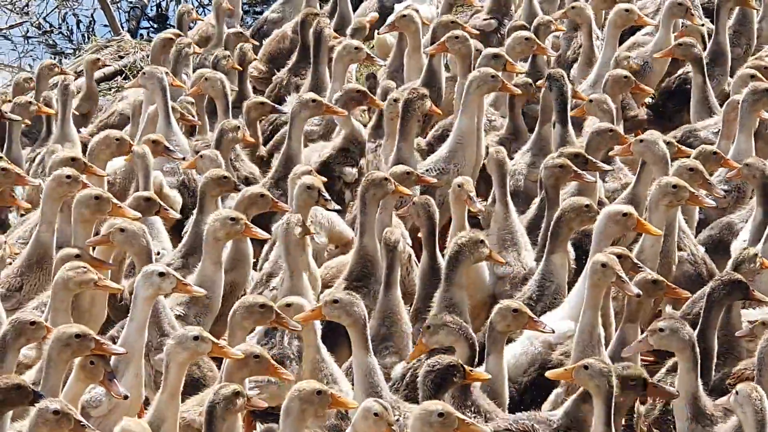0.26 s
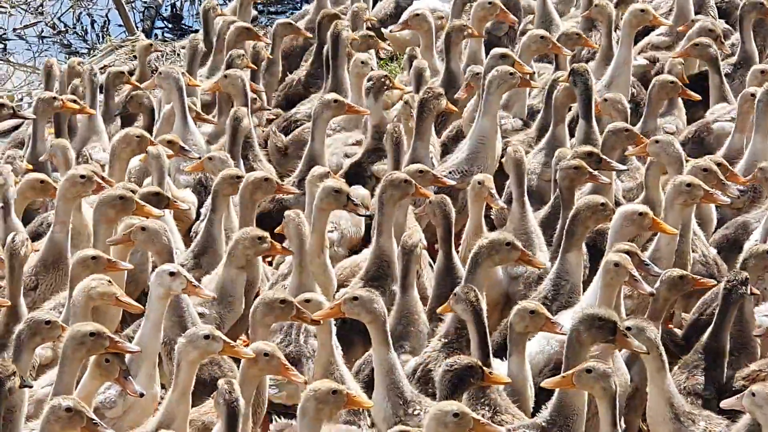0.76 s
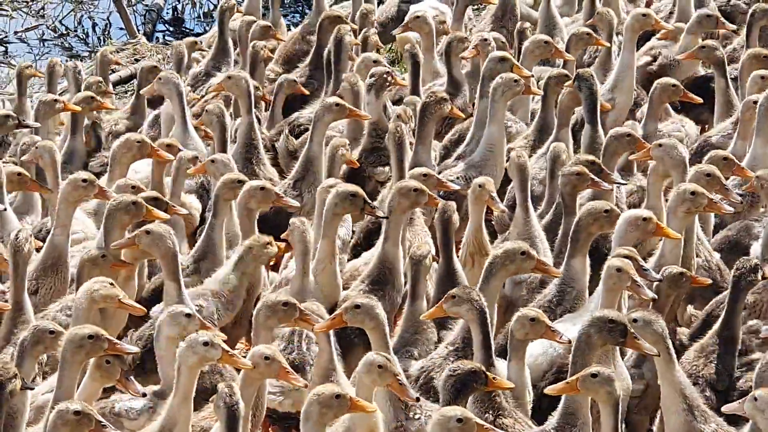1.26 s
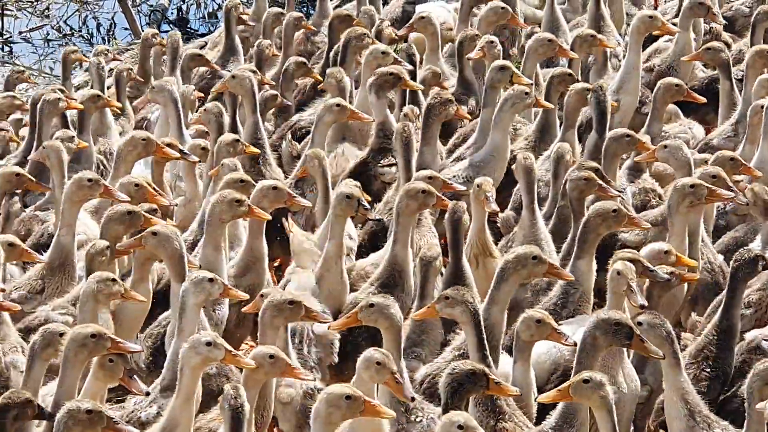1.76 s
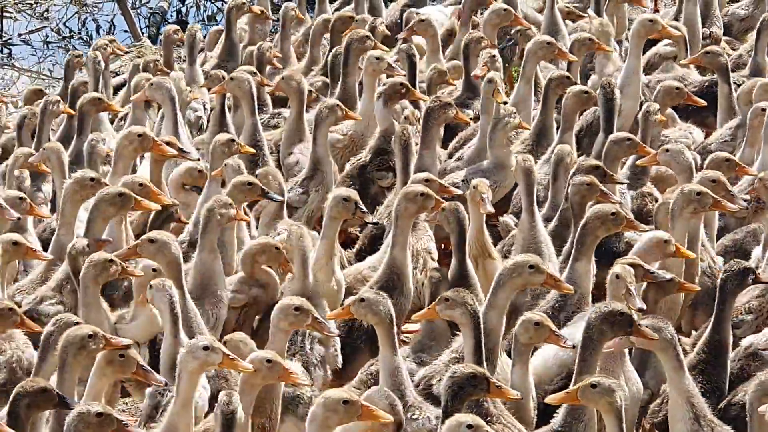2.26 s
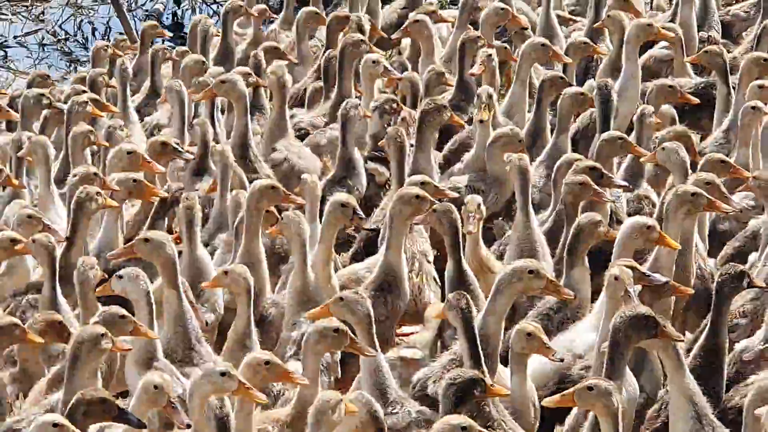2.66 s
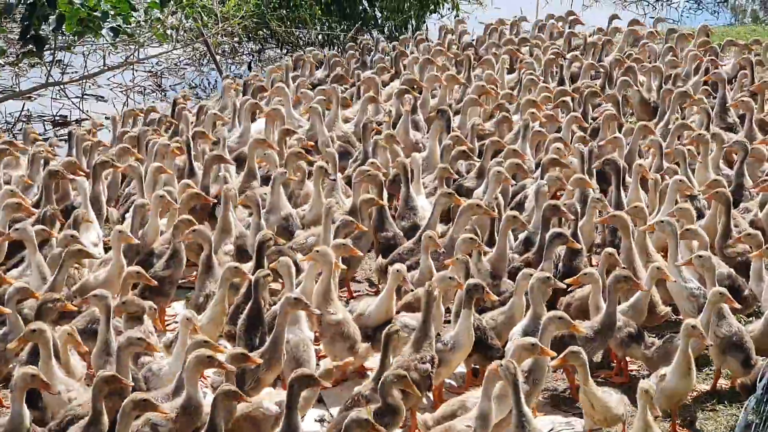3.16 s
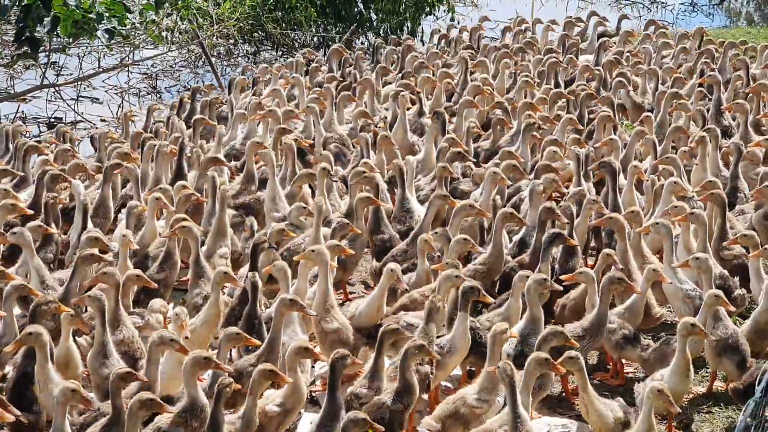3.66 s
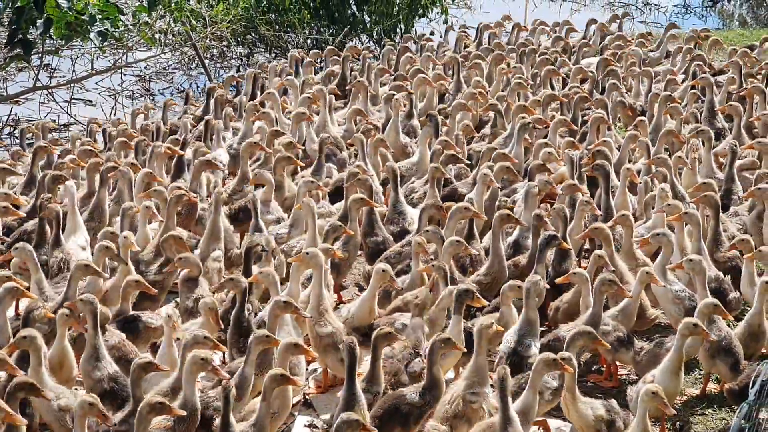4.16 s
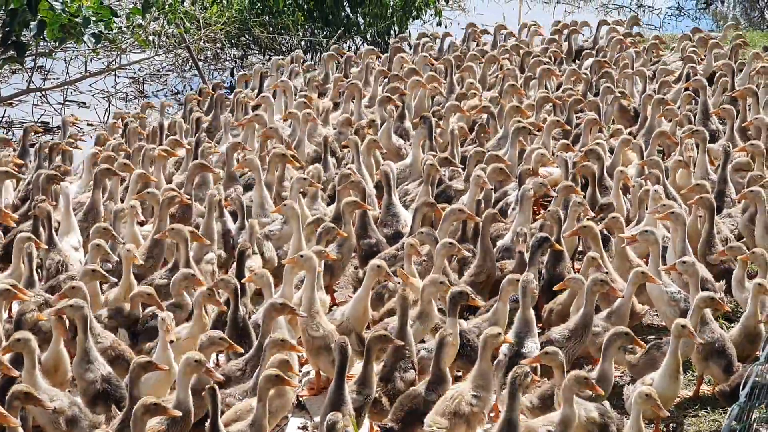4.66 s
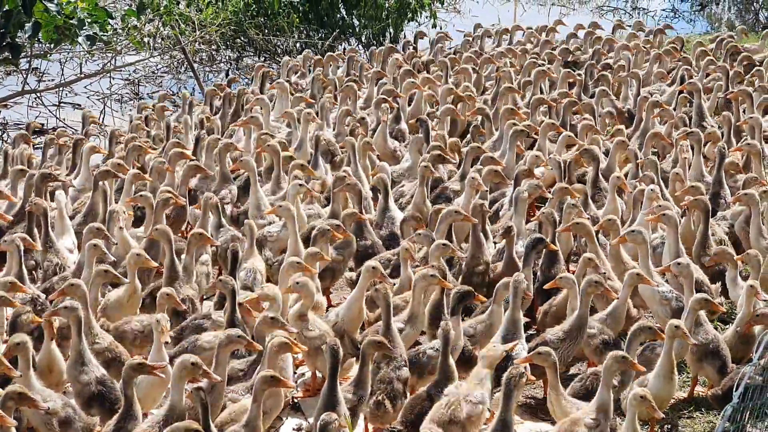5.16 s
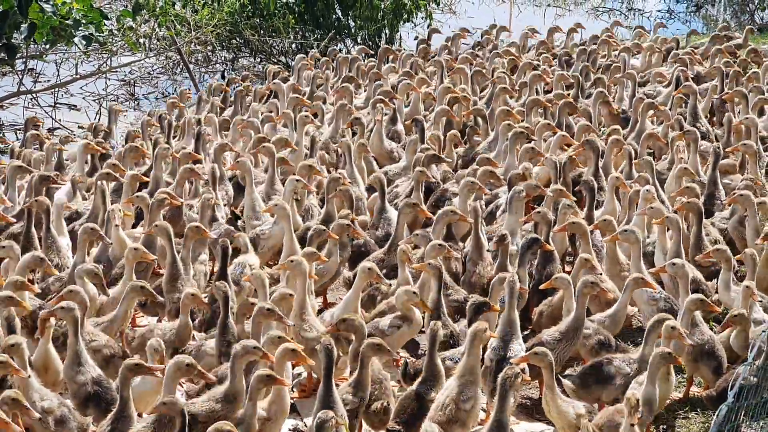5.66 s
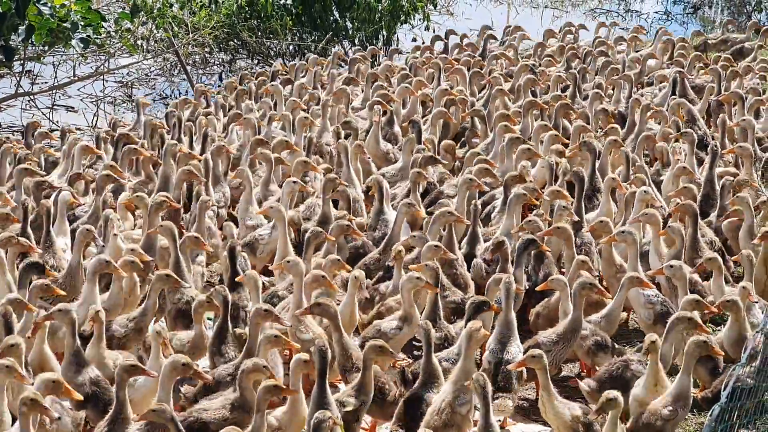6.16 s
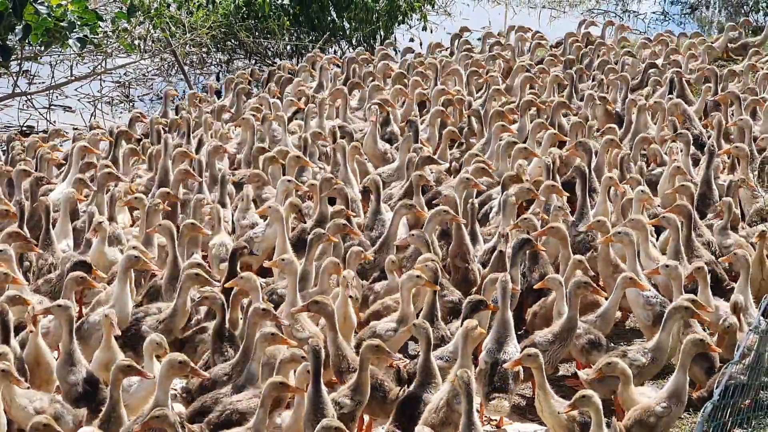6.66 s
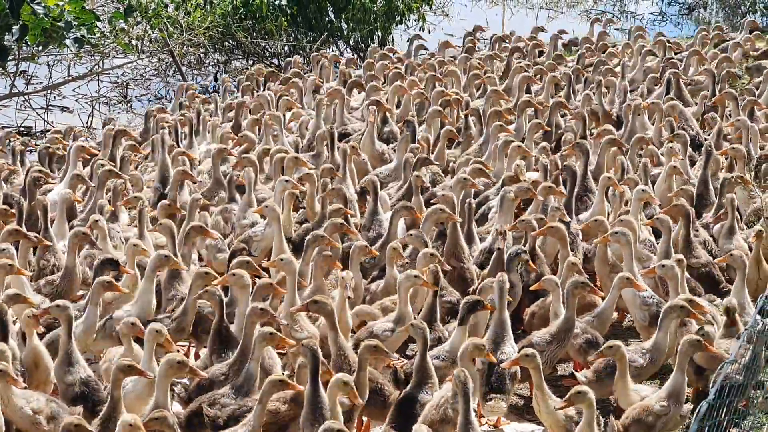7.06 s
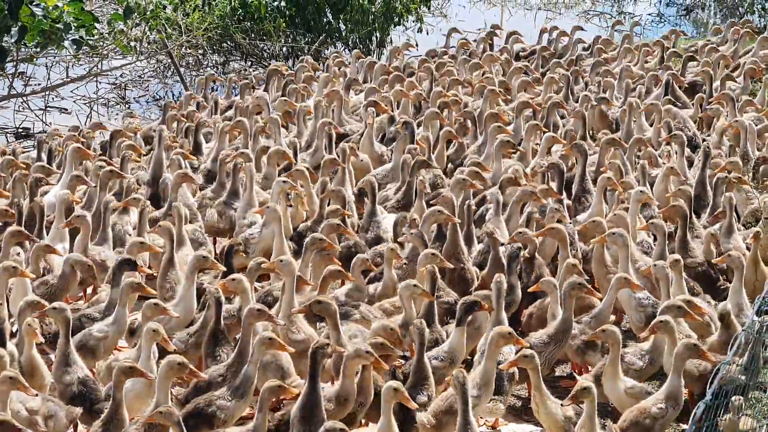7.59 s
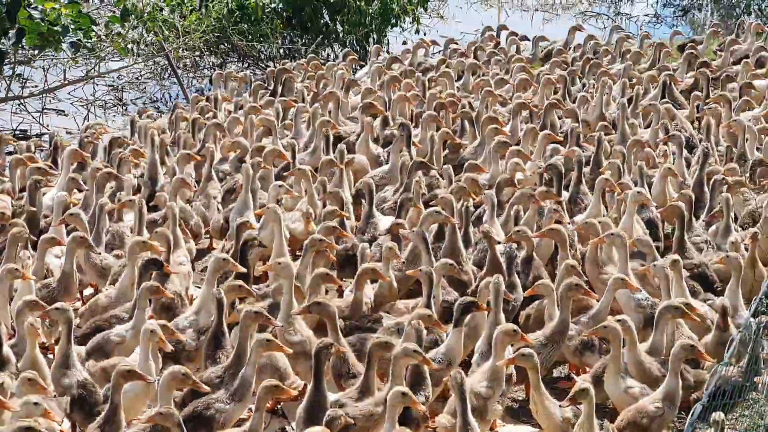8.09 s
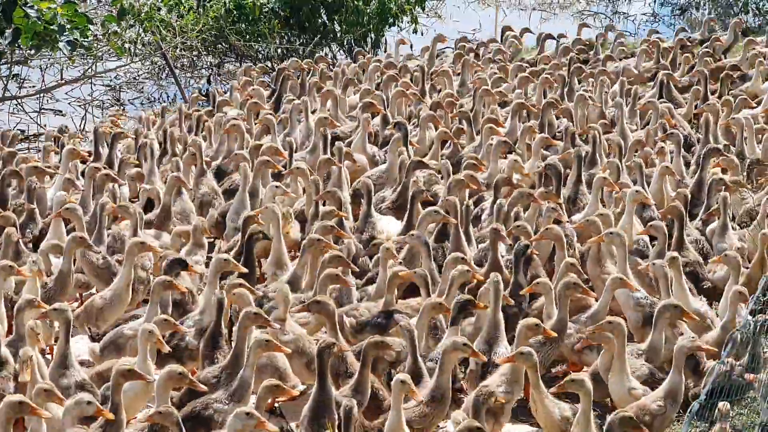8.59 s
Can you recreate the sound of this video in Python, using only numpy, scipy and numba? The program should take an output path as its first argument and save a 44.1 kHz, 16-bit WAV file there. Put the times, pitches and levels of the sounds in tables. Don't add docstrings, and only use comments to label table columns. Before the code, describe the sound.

Packed young ducks on an open bank whistle all at once, piercing and nearly pure in tone, blurring into a wash of far birds. Older ducks add low chirps, rough quacks and soft grunts. The nearest peeps are strong early on; then the sound cuts to a position farther back, where scattered peeps, squeaks and quacks ride the steady flock. Little echo, slight airy hiss, faint outdoor rumble, quieter left channel.

```python
import sys
import numpy as np
from scipy import signal
from scipy.fft import rfft, irfft, next_fast_len
from scipy.io import wavfile
from scipy.ndimage import uniform_filter1d, map_coordinates
from numba import njit

SR = 44100
rng = np.random.default_rng(int(sys.argv[2]) if len(sys.argv) > 2 else 0)


def store_wav(level_fs):
    pcm = np.round(np.clip(np.atleast_2d(level_fs), -1, 1) * 32767)
    wavfile.write(sys.argv[1], SR, pcm.T.astype(np.int16))


def invert_db(x):
    u = np.asarray(x, float) / 20
    return 10 ** u


N = 389403
CHANGE_S = 3.1705
TOP_HZ = 15750
SAG = .11
RASP, CROWD_RASP = .18, .3
ARCH_PER_S, STRAIGHT_S = 0.328, 0.037


def unit(x):
    return x / np.sqrt(np.mean(x ** 2) + 1e-20)


def along(points, hz, count=1):
    table = np.transpose(points)
    return np.interp(np.log(hz + 1), np.log(table[0] + 1), table[count])


def filtered(x, response):
    m = next_fast_len(N + 8192)
    return irfft(rfft(x, m) * response(np.fft.rfftfreq(m, 1 / SR)), m)[..., :N]


def wobble(rate):
    knots = rng.standard_normal(int(N * rate / SR) + 4)
    return map_coordinates(knots, [np.arange(N) * rate / SR])


def by_place(near_db, far_db):
    return invert_db(np.where(np.arange(N) / SR < CHANGE_S, near_db, far_db))


def rush(spectrum, alike, patchy_db):
    z = signal.stft(rng.standard_normal((2, N + 512)), nperseg=512)[2]
    field = uniform_filter1d(rng.standard_normal(z.shape[1:]), size=4, axis=0)
    field = uniform_filter1d(field, size=8, axis=1)
    a, b = signal.istft(z * invert_db(patchy_db * unit(field)), nperseg=512)[1][:, :N]
    alike = np.clip(alike, 0, 1)
    left = alike * a + np.sqrt(1 - alike ** 2) * b
    return unit(filtered(np.array([left, a]), lambda hz: invert_db(along(spectrum, hz))))


@njit
def sing(notes, partials, place, flutter, shake, rasp, edge, droop, hook, sr, n):
    out = np.zeros((2, n))
    for i in range(len(notes)):
        start, size = int(notes[i, 0] * sr), int(notes[i, 1] * sr)
        a, b, c = notes[i, 2], notes[i, 3], notes[i, 4]
        phase = 0.0
        for j in range(max(0, -start), min(size, n - start)):
            u = j / size
            hz = a * (2 * u - 1) * (u - 1) + 4 * b * u * (1 - u) + c * u * (2 * u - 1)
            hz *= 1 - droop * u ** 6 + hook * np.exp(-20 * u)
            phase += 2 * np.pi * hz / sr * (1 + shake * flutter[(j + i * 7919) % n])
            swell = notes[i, 5] * np.sin(np.pi / 2 * min(1.0, 2 * u / edge, (1 - u) / edge)) ** 2
            swell *= np.exp(rasp * flutter[(j + i * 5081 + n // 2) % n])
            for k in range(partials.shape[1]):
                strength = swell * partials[i, k]
                left_phase = (k + 1) * (phase + place[i, 1]) + k * k
                out[0, start + j] += strength * place[i, 0] * np.sin(left_phase)
                out[1, start + j] += strength * np.sin((k + 1) * phase + k * k)
    return out


def voices(notes, partial_db, scatter_db, spread, shake, edge, droop=SAG, rasp=RASP, hook=0.):
    notes = np.array(notes, float)
    notes[:, 5] = invert_db(notes[:, 5])
    count = np.shape(partial_db)[-1]
    luck = rng.standard_normal((len(notes), 2 + count))
    is_overtone = np.arange(count) > 0
    partials = invert_db(partial_db + scatter_db * luck[:, 2:] * is_overtone)
    place = np.column_stack([invert_db(4.24 * spread * luck[:, 0]), spread * luck[:, 1]])
    edge = np.clip(edge, .02, .5)
    return sing(notes, partials, place, wobble(150), shake, rasp, edge, droop, hook, SR, N)


def arched(calls, arch_share):
    s, length, hz, glide, db = np.transpose(calls)
    ends = hz * (1 - arch_share * ARCH_PER_S * (length - STRAIGHT_S))
    return np.column_stack([s, length, ends - glide / 2, hz, ends + glide / 2, db])


# start_s, length_s, middle_hz, glide_hz, level_db
LEAD_PEEPS = [
    (0.082, 0.11, 3230, 332, -20.5),
    (0.352, 0.12, 3254, 382, -18),
    (0.64, 0.12, 3190, 356, -18.5),
    (4.66, 0.07, 2095, -2, -26),
    (4.92, 0.08, 2274, 263, -22),
    (5.178, 0.088, 2272, 234, -20.5),
    (5.45, 0.081, 2250, 200, -25),
]
# start_s, length_s, middle_hz, glide_hz, level_db
NEAR_PEEPS = [(0.146, 0.039, 2890, -2, -21), (0.176, 0.0815, 3040, 62, -14.5),
              (0.472, 0.084, 3010, 260, -14), (0.745, 0.105, 3007, 209, -16),
              (0.999, 0.047, 3130, -280, -21.5), (1.075, 0.095, 2913, 2, -15.5),
              (2.93, 0.055, 2500, 207, -24), (1.54, 0.08, 2740, -130, -31.5),
              (1.573, 0.087, 2648, 185, -26), (1.858, 0.035, 2790, -190, -18.5),
              (1.879, 0.11, 2430, 121, -22.5), (2.046, 0.051, 2780, -250, -18.5),
              (2.103, 0.028, 2830, -100, -16), (2.178, 0.081, 2910, -110, -19),
              (2.223, 0.11, 2780, 40, -33), (3.015, 0.055, 2500, 78, -28), (2.445, 0.085, 2947, 341, -14),
              (2.657, 0.12, 2883, 262, -18.5), (2.896, 0.19, 2840, 369, -20),
              (2.945, 0.084, 3164, 300, -23), (3.082, 0.089, 2807, 216, -25.5)]
# start_s, length_s, middle_hz, glide_hz, level_db
FAR_PEEPS = [(3.306, 0.095, 2575, -240, -23), (3.794, 0.076, 2403, 33, -30), (4.103, 0.039, 2450, 33, -18),
             (4.363, 0.06, 2440, -190, -24.5), (5.139, 0.058, 2770, -150, -21),
             (5.235, 0.048, 2660, -380, -20.5), (5.381, 0.068, 2780, -110, -23),
             (5.937, 0.043, 2582, -49, -21.5), (6.153, 0.086, 2656, -101, -27),
             (6.44, 0.19, 3210, -19.5, -18.5), (6.496, 0.044, 2640, -190, -20),
             (6.788, 0.067, 2420, -290, -22), (6.845, 0.065, 2310, -300, -21.5),
             (7.145, 0.061, 3090, 188, -23), (7.18, 0.036, 2576, -230, -22), (7.444, 0.063, 3010, 65, -19),
             (7.702, 0.083, 3040, 290, -20.5), (7.6, 0.093, 2416, 155, -28), (8.01, 0.082, 3020, 445, -20),
             (8.29, 0.077, 3090, 250, -24.5)]
# start_s, length_s, middle_hz, glide_hz, level_db
SQUEAKS = [(0.158, 0.093, 6020, 279, -39.5), (0.738, 0.067, 7100, 128, -29.5),
           (0.954, 0.049, 7150, -4, -41), (2.037, 0.1, 4840, -160, -38.5), (2.088, 0.04, 5740, 28, -32),
           (2.208, 0.085, 5890, 188, -39), (2.968, 0.1, 6380, 354, -29.5), (3.995, 0.037, 7070, -170, -38),
           (4.665, 0.064, 4950, -110, -37.5), (6.46, 0.19, 9640, 158, -67),
           (5.62, 0.087, 5270, -500, -41.5), (5.715, 0.086, 4070, -600, -48.5),
           (5.84, 0.053, 5530, 154, -45), (6.07, 0.078, 4150, -400, -47), (6.11, 0.066, 5610, 100, -44),
           (7.712, 0.1, 6170, 699, -43.5), (8.003, 0.1, 6000, 661, -42)]


def near_birds():
    clear = dict(spread=.3, shake=.003)
    lead = voices(arched(LEAD_PEEPS, .9), np.array([-5, -34]), 0, **clear,
                  edge=.12, droop=.14, rasp=.08, hook=.12)
    peeps = voices(arched(NEAR_PEEPS + FAR_PEEPS, 0.92), np.array([-3.5, -32, -50]), 4, **clear, edge=0.19)
    squeaks = voices(arched(SQUEAKS, 0.36), np.array([-3.5, -43]), 3, spread=0.18, shake=0.0057, edge=0.52)
    return lead + invert_db(-2.0) * peeps + invert_db(6.5) * squeaks


# start_s, length_s, middle_hz, glide_hz, level_db
FRONT_ROW = [(3.221, 0.069, 2650, 146, -25.5), (3.749, 0.057, 2240, 85, -21),
             (4.016, 0.029, 2560, -115, -29), (4.1, 0.11, 2570, -120, -26.5), (4.405, 0.072, 2610, 46, -25),
             (4.443, 0.045, 2400, 46, -27), (4.916, 0.071, 2485, -106, -32),
             (4.948, 0.055, 2760, -152, -23.5), (5.479, 0.039, 2450, 22, -23),
             (5.531, 0.043, 2710, -138, -23), (5.58, 0.041, 2432, -94, -24),
             (5.624, 0.08, 2420, 207, -21.5), (5.633, 0.059, 2619, -26, -24),
             (5.667, 0.06, 2770, -309, -25), (5.845, 0.038, 2233, -50, -23.5),
             (5.964, 0.042, 2530, 132, -32), (5.995, 0.093, 2498, 162, -26.5),
             (6.135, 0.069, 2400, -62, -23), (6.231, 0.056, 2620, -70, -22.5),
             (6.599, 0.045, 2570, -26, -22), (6.704, 0.097, 2410, -64, -31),
             (6.881, 0.062, 2520, -127, -23.5), (7.003, 0.064, 2390, -186, -31),
             (7.098, 0.052, 2450, -43, -21), (7.125, 0.037, 2230, -20, -24),
             (7.441, 0.059, 2200, -112, -31), (7.563, 0.048, 2590, -32, -21),
             (7.58, 0.048, 2330, -10, -22.5), (7.705, 0.062, 2250, -131, -29),
             (7.821, 0.036, 2720, -63, -32), (7.859, 0.067, 2740, 28, -28),
             (7.876, 0.054, 2563, -29, -24.5), (7.992, 0.071, 2220, -150, -27),
             (8.123, 0.059, 2360, 70, -29), (8.259, 0.052, 2370, 38, -29), (8.297, 0.022, 2930, -70, -17),
             (8.718, 0.11, 2453, -92, -27.5)]
# start_s, length_s, middle_hz, glide_hz, level_db
THIN_PEEPS = [(4.69, .09, 2740, -150, -24.5), (4.77, 0.06, 3300, 100, -31), (4.829, 0.063, 3230, -350, -33),
              (5.15, 0.036, 3760, 148, -29.5), (5.95, 0.054, 3070, 53, -30), (7.13, 0.077, 3346, -400, -33),
              (7.34, 0.068, 2990, 202, -22), (7.84, 0.061, 2660, -250, -21),
              (8.149, 0.057, 3200, -700, -34.5), (8.34, 0.068, 2690, -450, -30),
              (8.45, 0.088, 3650, 200, -39), (8.514, 0.04, 3050, -100, -21), (8.58, 0.062, 3134, 48, -27.5)]
# start_s, length_s, middle_hz, glide_hz, level_db
OVERTONES = [(0.24, 0.061, 5810, 200, -35), (0.286, 0.076, 4963, -270, -43), (1.386, 0.05, 6820, -59, -28),
             (1.958, 0.049, 5640, 95, -34), (2.405, 0.062, 5760, 78, -38), (2.469, 0.075, 6150, 303, -45),
             (2.669, 0.12, 5790, 18, -32.5), (2.736, 0.051, 6160, 184, -31),
             (2.948, 0.082, 7000, 157, -35.6), (2.977, 0.082, 5750, -51, -35),
             (3.078, 0.086, 4910, 264, -41), (3.633, 0.064, 5650, -132, -37.5),
             (5.595, 0.022, 6050, -62, -41), (6.222, 0.072, 5370, 168, -38),
             (6.823, 0.097, 5750, 16, -39.5), (7.537, 0.061, 5720, -33, -40)]
# start_s, length_s, middle_hz, glide_hz, level_db
LOW_NOTES = [(0.579, 0.06, 1170, -168, -37.5), (1.887, 0.05, 1237, -103, -41),
             (2.486, 0.049, 1208, -78, -35), (2.533, 0.063, 1347, -176, -46),
             (2.645, 0.033, 1400, -171, -46), (3.996, 0.04, 1430, -4, -41), (4.106, 0.041, 1406, -12, -40),
             (4.73, 0.047, 1436, -189, -36), (5.017, 0.068, 1444, -183, -37.7),
             (5.145, 0.045, 1330, -150, -42.5), (5.595, 0.043, 1346, -145, -38),
             (6.117, 0.036, 1380, -18, -31), (6.887, 0.031, 1370, -62, -37.5),
             (6.951, 0.037, 1240, -29, -39.5), (7.274, 0.05, 1513, -67, -38),
             (7.577, 0.053, 1172, -66, -39.5), (8.234, 0.032, 1363, -99, -39)]


def plain_calls():
    whistles = voices(arched(FRONT_ROW + THIN_PEEPS, 0.33), np.array([-6, -37]), 5.3,
                      spread=0.87, shake=0.0044, edge=0.17, droop=0.049)
    others = voices(arched(OVERTONES + LOW_NOTES, 0.2), np.array([-5.5]), 0,
                    spread=0.46, shake=0.0088, edge=0.2, droop=0.01)
    return whistles + others


# start_s, level_db, pitch_hz, length_s
NEAR_CHIRPS = [(0.167, -42, 1374, 0.055), (0.245, -37.5, 1340, 0.068), (0.326, -32, 1310, 0.014),
               (0.677, -41, 1290, 0.031), (0.819, -34.5, 1484, 0.07), (1.11, -39, 1555, 0.065),
               (1.351, -35, 1180, 0.053), (1.559, -35.5, 1584, 0.069), (1.692, -42, 1205, 0.03),
               (1.832, -35.5, 1194, 0.063), (1.957, -37, 1176, 0.059), (2.2015, -34, 1197, 0.051),
               (2.453, -31, 1258, 0.034), (2.616, -36, 1295, 0.018), (2.704, -30, 1260, 0.031),
               (2.779, -33, 1210, 0.069), (3.002, -28.5, 1313, 0.039), (3.05, -33.5, 1214, 0.062),
               (3.137, -38, 1306, 0.036)]
# start_s, level_db, pitch_hz, length_s
FAR_CHIRPS = [(3.242, -35, 1370, 0.043), (3.374, -31.5, 1276, 0.039), (3.441, -40, 1298, 0.04),
              (3.654, -34, 1270, 0.032), (4.099, -35.5, 1255, 0.038), (4.213, -46, 1244, 0.029),
              (4.329, -36, 1340, 0.072), (4.39, -43, 1170, 0.045), (4.45, -49, 1456, 0.049),
              (4.502, -44, 1320, 0.03), (4.536, -37, 1356, 0.036), (4.6313, -38, 1328, 0.068),
              (5.3024, -30.5, 1430, 0.063), (5.562, -31.5, 1400, 0.03), (5.8541, -36, 1247, 0.027),
              (5.984, -39.5, 1410, 0.028), (6.104, -33, 1295, 0.043), (6.25, -41, 1378, 0.026),
              (6.29, -49, 1426, 0.06), (6.385, -38.5, 1357, 0.023), (6.548, -39, 1383, 0.034),
              (6.856, -39, 1266, 0.032), (7.063, -43, 1530, 0.026), (7.151, -38, 1390, 0.033),
              (7.203, -34.5, 1335, 0.074), (7.442, -35.5, 1346, 0.023), (7.507, -34, 1302, 0.059),
              (7.574, -39, 1267, 0.04), (7.66, -33, 1358, 0.028), (7.974, -38.5, 1373, 0.03),
              (8.022, -33, 1413, 0.033), (8.325, -31, 1382, 0.048), (8.508, -38, 1367, 0.02),
              (8.656, -39, 1395, 0.062), (8.735, -26, 1422, 0.042)]


def chirps():
    s, db, hz, length = np.transpose(NEAR_CHIRPS + FAR_CHIRPS)
    notes = np.column_stack([s - .006, length, 1.06 * hz, hz, 0.994 * hz, db + 1.0])
    return voices(notes, np.array([-4.0, -15, -22, -22.5, -24.0]), 6.2, spread=0.72, shake=0.015, edge=0.23)


# frequency_hz, level_db
BEAK = [(200, -46), (900, -31), (1300, -8), (1700, -10.5), (2400, 7), (3600, -4), (4500, -13.5),
        (6000, -3.5), (7500, -13), (8700, -39), (12000, -38.5), (16000, -53)]


def quacks(calls, length, breath, rise_db, shake, pitch_hz=None):
    s, db, *own_hz = np.transpose(calls)
    luck = rng.standard_normal((len(s), 2))
    hz = own_hz[0] if own_hz else pitch_hz * np.exp(.08 * luck[:, 0])
    lengths = length * np.exp(0.165 * luck[:, 1])
    notes = np.column_stack([s - .01, lengths, 1.02 * hz, hz, .93 * hz, db - 10.5])
    order = np.arange(1, int(TOP_HZ / hz.max()))
    partial_db = along(BEAK, hz[:, None] * order) + rise_db * order
    stack = voices(notes, partial_db, 1.84, spread=0.16, shake=shake, edge=0.19, droop=.04, rasp=6 * shake)
    swell = np.sqrt(np.abs(uniform_filter1d(stack ** 2, size=300)))
    return stack + breath * swell * rush(BEAK + [(17000, -120)], 1.0, patchy_db=1.0)


# start_s, level_db
QUACKS = [(0.4758, -30), (0.7394, -29.5), (1.0194, -27), (1.2696, -29), (1.3814, -32.5), (1.6985, -32),
          (1.928, -34), (2.1194, -30.5), (2.3398, -32), (3.3, -25.5), (3.6047, -30), (3.8487, -27.5),
          (4.506, -31), (5.2913, -32.5), (5.5689, -32), (5.8551, -36), (7.5494, -31.5), (8.2813, -33),
          (8.5185, -29.5)]
# start_s, level_db, pitch_hz
CLEAR_QUACKS = [(0.245, -23, 440.3), (3.465, -24, 401), (3.772, -26.5, 412), (4.717, -26, 373),
                (5.94, -34, 370), (6.14, -28, 396.5), (6.275, -41, 364), (6.578, -22.5, 378),
                (6.838, -22, 385), (7.035, -25.5, 360), (7.275, -24, 379)]
# start_s, level_db
YELPS = [
    (4.012, -34),
    (4.262, -33),
]


def quacking():
    hoarse = quacks(QUACKS, .055, .4, -.15, .03, 420)
    clear = quacks(CLEAR_QUACKS, .075, .08, -.9, .004)
    yelps = quacks(YELPS, .045, .12, .9, .024, 715)
    return hoarse + clear + yelps


# start_s, level_db, pitch_hz
GRUNTS = [
    (0.383, -65, 374),
    (0.663, -67, 457),
    (0.846, -63.5, 378),
    (1.058, -69, 365),
    (1.121, -59, 388),
    (1.359, -66, 444),
    (1.536, -66, 412),
    (5.317, -66, 338),
]


def grunts():
    s, db, hz = np.transpose(GRUNTS)
    notes = np.column_stack([s - .01, 0.04 + 0 * s, hz, hz, hz, db + 7.0])
    return voices(notes, np.array([-1.5, -14]), 4, spread=0.23, shake=0.0052, edge=0.33)


def cracked(calls, length, start, end, gap_hz, side_db):
    notes = []
    for s, hz, db in calls:
        for k in range(-1, 2):
            shift = k * gap_hz
            notes.append((s, length, start * hz + shift, hz + shift, end * hz + shift, db + abs(k) * side_db))
    return voices(notes, np.array([0]), 0, spread=0.47, shake=0.012, edge=0.33, droop=0.037)


# start_s, top_hz, level_db
WARBLES = [
    (5.59, 5880, -40),
    (5.865, 5850, -39),
    (6.145, 5930, -41),
]
# start_s, middle_hz, level_db
CROAKS = [
    (4.51, 1300, -47),
    (5.56, 1335, -50),
    (5.85, 1306, -43),
    (6.81, 1326, -51),
    (6.85, 1322, -48),
    (7.05, 1326, -47.5),
    (7.29, 1396, -44.5),
    (8.49, 1337, -47),
    (8.62, 1350, -49),
]


def cracked_calls():
    return cracked(WARBLES, 0.06, 0.91, 0.9, 306, -4.5) + cracked(CROAKS, 0.0537, 1.08, 0.97, 180.4, -6.5)


def crowd(spread_db, hz, hz_spread, length, arch, fall, partial_db, spread, count):
    luck = rng.standard_normal((count, 6))
    middle = hz * np.exp(hz_spread * np.tanh(.7 * luck[:, 0]))
    start = middle * (1 + fall - arch + arch * luck[:, 1])
    end = middle * (1 - fall - arch + arch * luck[:, 2])
    s = (np.arange(count) + luck[:, 3]) * N / SR / count
    lengths = length * np.exp(0.34 * luck[:, 4])
    notes = np.column_stack([s, lengths, start, middle, end, spread_db * np.tanh(luck[:, 5])])
    return unit(voices(notes, partial_db, 6.2, spread, shake=0.006, edge=0.26, droop=0.044, rasp=CROWD_RASP))


# start_s, chorus_db, shrillness_db
FLOCK = [(0.0, -23.5, -11), (0.1, -25, -10), (1.28, -27.5, -3), (3.05, -24.5, -7), (3.25, -26.5, -11),
         (6.22, -27.5, -15), (6.39, -28.5, -20), (6.52, -24, -16), (6.69, -31, -12), (6.91, -27.5, -20),
         (8.83, -28.5, -15)]
# frequency_hz, density_db_per_hz
WASH = [(600, -72), (1000, -43.5), (1350, -27.5), (1650, -26.5), (1900, -16), (2200, -8.5), (2600, -2.5),
        (3100, -7.5), (3820, -21.5), (4540, -27), (5100, -18), (7070, -28.5), (8020, -34.5), (8600, -82),
        (12000, -110)]
# frequency_hz, density_db_per_hz
HISS = [(7000, -39), (8000, -8), (8600, -17), (10000, -16), (11000, -15), (15600, -18)]


def chorus():
    s, level_db, shrill_db = np.transpose(FLOCK)
    t = np.arange(N) / SR
    level = invert_db(np.interp(t, s, level_db))
    shrill = invert_db(np.interp(t, s, shrill_db + 15))
    pure = np.array([0])
    whistles = crowd(3.5, 2450, .14, 0.055, 0.03994, 0.026, pure, 0.99, count=640)
    high = crowd(3.9, 2950, 0.11, 0.0457, 0.0348, 0.021, pure, 1.0, count=460) * by_place(-1.5, -9)
    overtones = crowd(1.4, 5900, 0.22, 0.0406, 0.02014, 0.013, pure, 1.91, count=1900)
    low = crowd(5.8, 1300, 0.0884, 0.0218, 0.017, 0.06, np.array([-3.5, -3.0, -13.0, -13.5]), 0.59, count=420)
    far = rush(WASH, 0.024, patchy_db=3.5)
    rustle_db = 6.5 * np.exp(-((t - 0.8) / 0.22) ** 4)
    top = rush(HISS, 0.15, patchy_db=2) * invert_db(rustle_db + 1.1 * wobble(13) + 2.0 * wobble(70))
    flock = invert_db(-6.5) * (whistles + high) + invert_db(-8) * far + invert_db(-22.5) * shrill * overtones
    return level * flock + by_place(-61, -66) * top + by_place(-45.5, -48.5) * low


# frequency_hz, density_db_per_hz
YARD = [(15, -49), (25, -14.5), (70, 1), (103, -5.5), (157, -8), (390, -7), (610, -12), (1000, -10.5),
        (1300, -12), (2200, -120)]


def yard():
    tick = np.zeros(N)
    tick[int(CHANGE_S * SR)] = invert_db(-30.0)
    return by_place(-64.8, -68.5) * rush(YARD, .25, patchy_db=.8) + tick


def scene():
    birds = near_birds() + plain_calls() + cracked_calls() + chirps() + grunts() + quacking() + chorus()
    t = np.arange(SR // 5) / SR
    scatter = rng.standard_normal((2, len(t))) * invert_db(-60 * t / 0.099)
    echo = signal.fftconvolve(birds, scatter / np.linalg.norm(scatter[0]), axes=1)[:, :N]
    return birds + invert_db(-11.0) * echo + yard()


def top_cut(x):
    return signal.sosfilt(signal.butter(12, 15700, fs=SR, output="sos"), x)


# frequency_hz, near_db, far_db, lead_rad
LEFT = [(60, -11.5, -11.5, 1.5), (600, -11.5, -11, 2.35), (1030, -11, -13.5, 1.06),
        (1530, -8.5, -12.5, 1.68), (1496, -12, -2, 3.4), (1954, -1.5, -14.5, 8.05),
        (2450, -18.5, -11, 6.97), (2780, -1.5, -11, 7.68), (3200, -7.5, -9, 12.84), (4070, -8, -5, 13.8),
        (5740, -13.5, -9.5, 12.8), (8260, -8.5, -10.5, 17.4), (15000, -3.5, -10, 20)]


def record(dry):
    def port(column):
        return filtered(dry[0], lambda hz: invert_db(along(LEFT, hz, column)) * np.exp(1j * along(LEFT, hz, 3)))

    left = np.where(np.arange(N) < CHANGE_S * SR, port(1), port(2))
    mix = invert_db(4.0) * filtered(np.array([left, dry[1]]), lambda hz: hz < TOP_HZ)
    return top_cut(mix)


dry = scene()
out = record(dry)
store_wav(out)
```